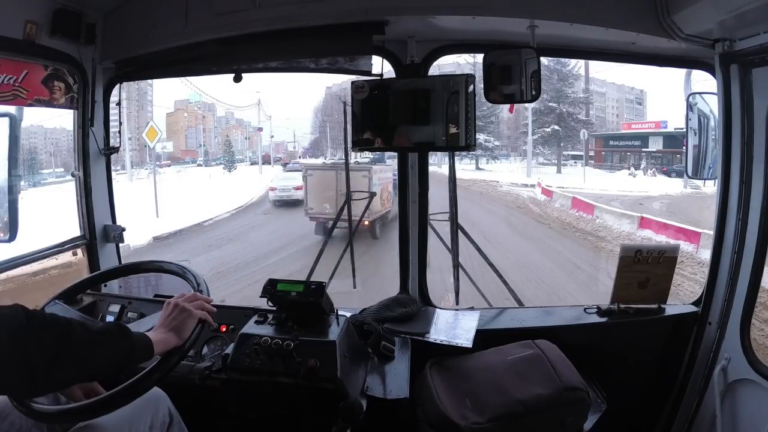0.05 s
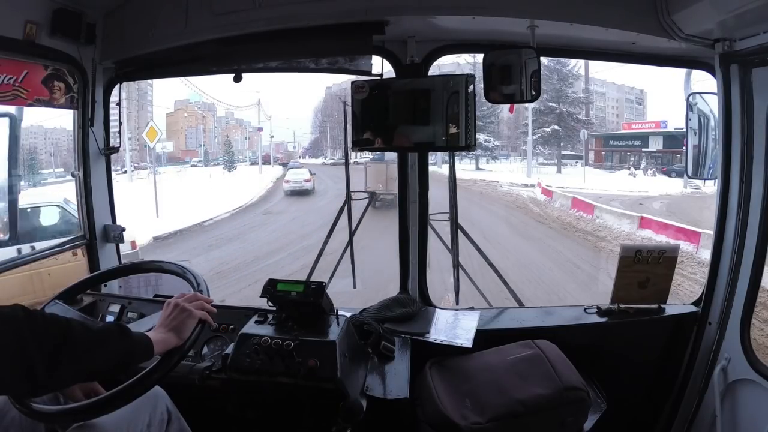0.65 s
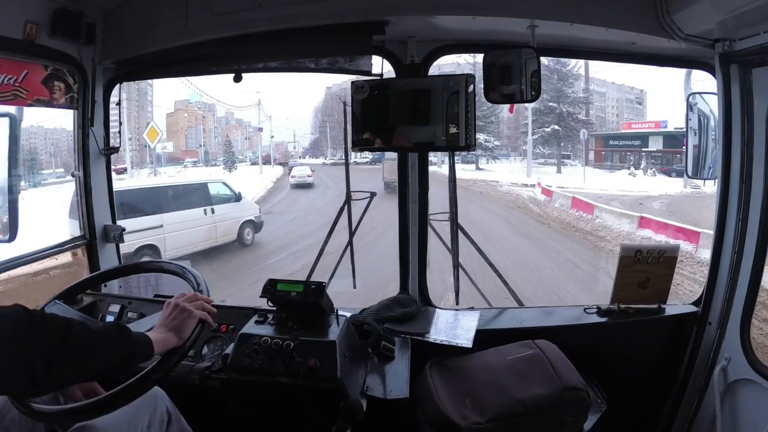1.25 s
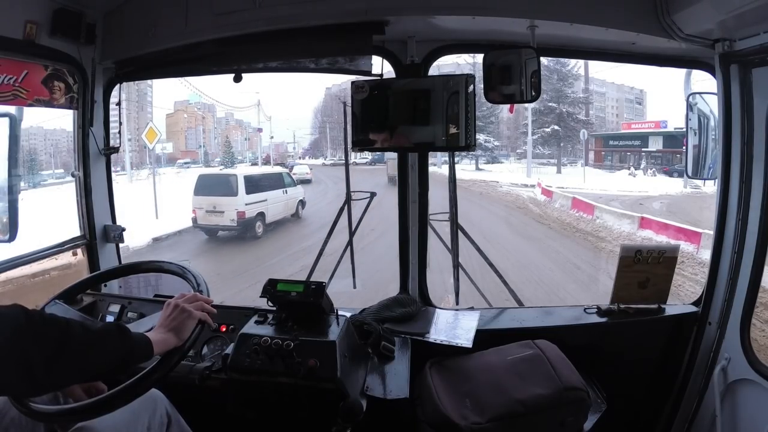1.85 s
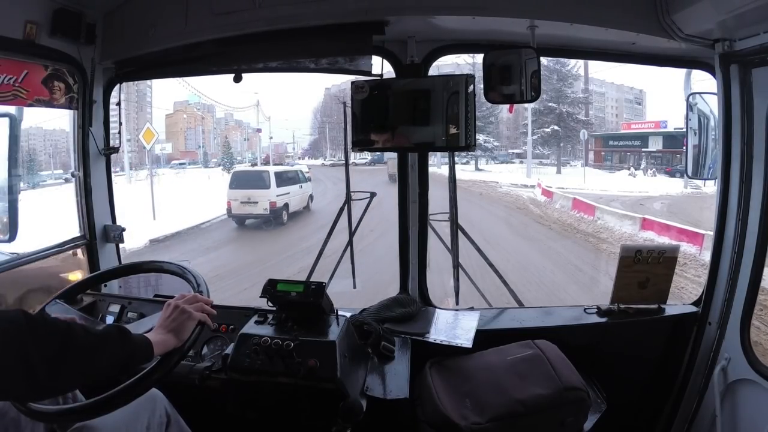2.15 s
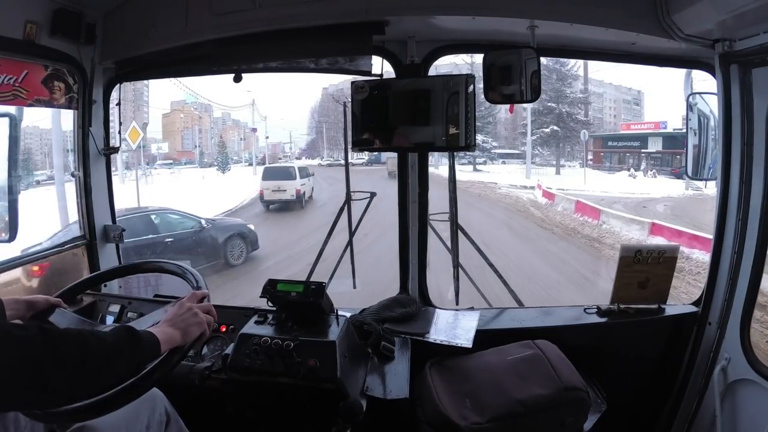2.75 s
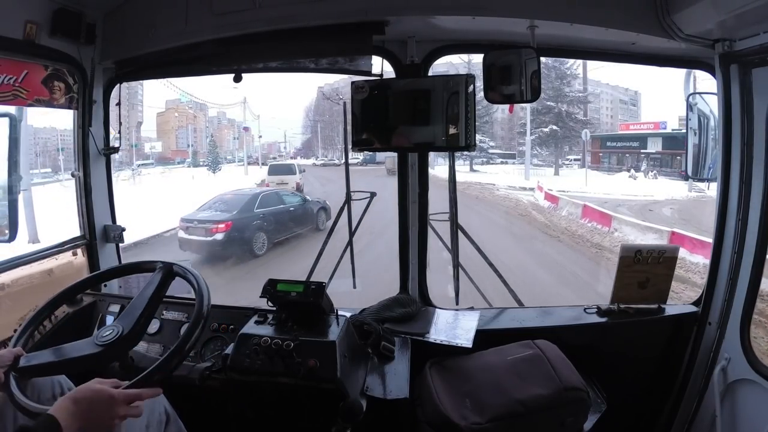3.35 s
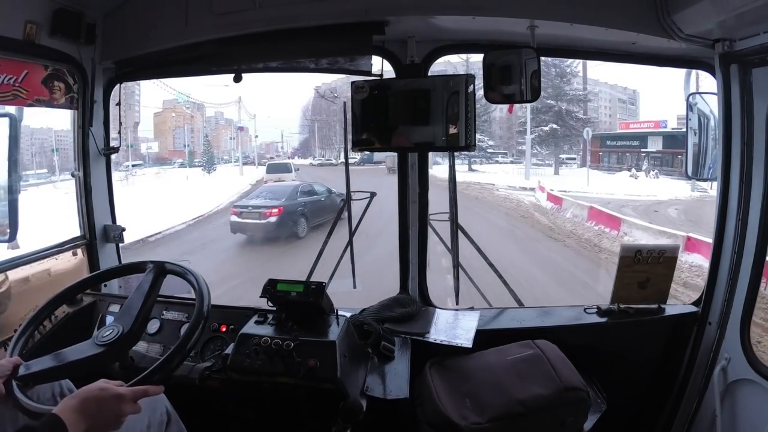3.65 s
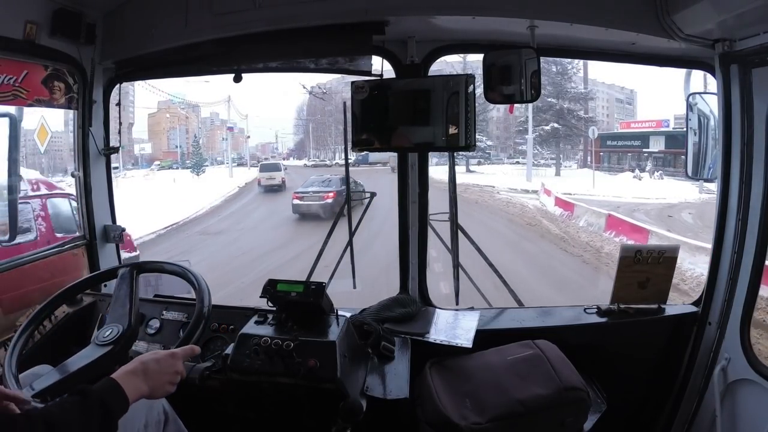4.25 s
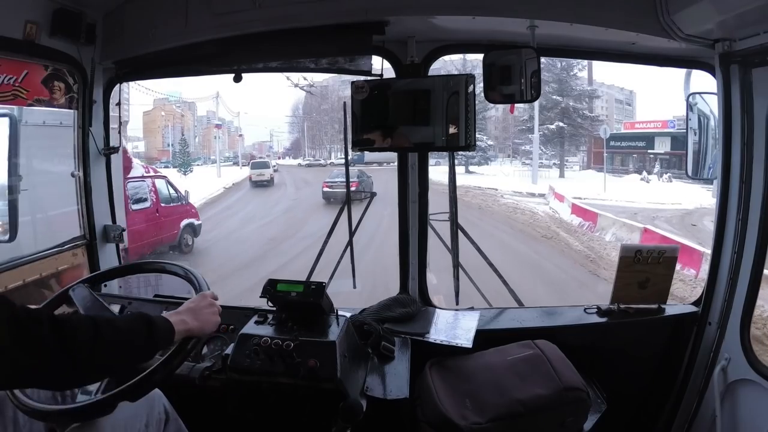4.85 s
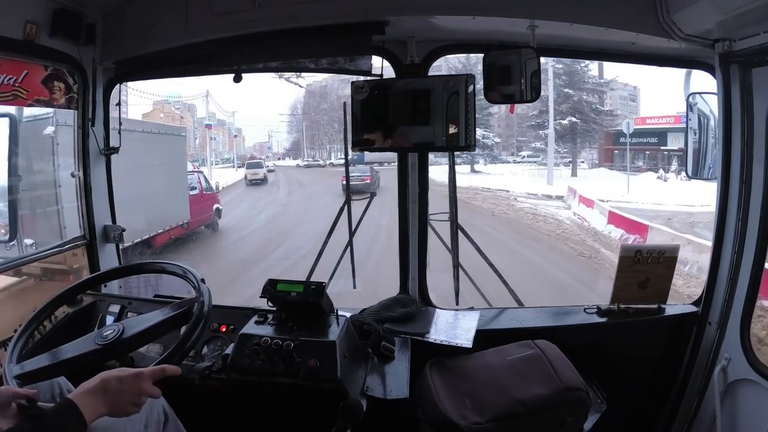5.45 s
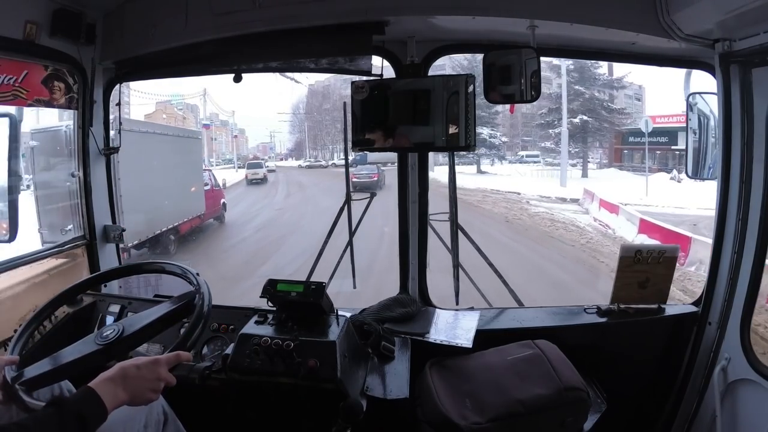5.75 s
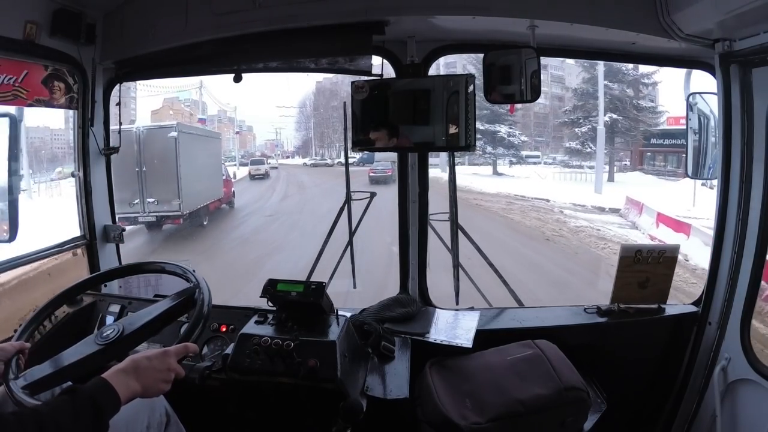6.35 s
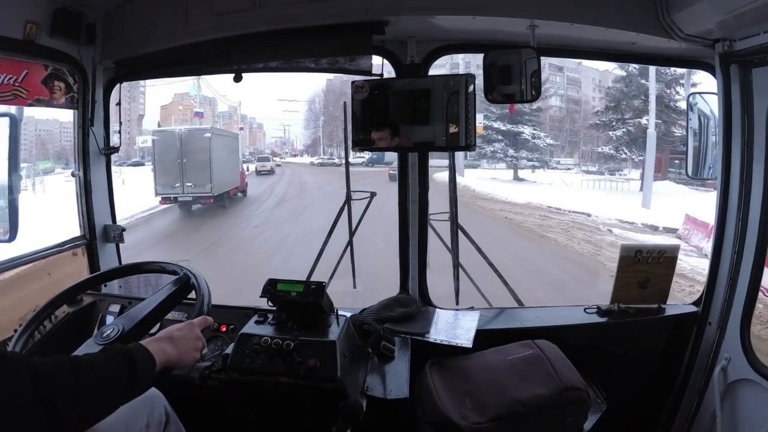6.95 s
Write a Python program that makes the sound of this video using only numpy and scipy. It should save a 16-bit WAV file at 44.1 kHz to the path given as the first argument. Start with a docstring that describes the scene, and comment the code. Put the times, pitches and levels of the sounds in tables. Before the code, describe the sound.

A steady low boom and the hiss of wet tyres on slush fill the cab of a slow trolleybus for seven seconds, heard in stereo. Bumps thud in the panels and rattle loose fittings from 0.4 to 0.9 seconds, at 2.3, in a cluster around 3.8 and again at 6.8. Slightly right, gears whine faintly, clearest between 5 and 6 seconds. An auxiliary motor holds a soft tone until 3 seconds, then sinks in pitch and fades. The electric drive hums briefly at about 2.2 seconds, returns at 3.5, is strong from 4 and stops at 6. Outside, overtaking vehicles throw up swishing spray, lightly around 3 seconds, louder at 5.4 and loudest from 6 to the end. A thin, very high electrical whistle stays at far right throughout.

```python
"""A low boom and the hiss of wet tyres, heard from a stereo microphone in the cab of a slow trolleybus.
The slushy road shakes the body; bumps knock the panels and rattle loose fittings. Outside, overtaking
vehicles throw up spray. A little to the right, gears whine faintly, an auxiliary motor runs and coasts
down, and the drive hums at 300 Hz while it draws current. A thin electrical whistle sits hard right."""
import sys
import numpy as np
from scipy import signal
from scipy.fft import rfft, irfft, next_fast_len
from scipy.io import wavfile
from scipy.ndimage import uniform_filter1d

SR = 44100
rng = np.random.default_rng(int(sys.argv[2]) if len(sys.argv) > 2 else 0)


def materialize(psi):
    """Save the field psi as 16-bit PCM at rate SR to the path in sys.argv[1].

    A 1-D psi becomes a single channel; in a 2-D psi each row is a channel.
    """
    bounded = np.clip(np.atleast_2d(psi).T, -1, 1)
    quanta = np.round(bounded * 32767).astype(np.int16)
    wavfile.write(sys.argv[1], SR, quanta)


N = 309141
T = np.arange(N) / SR
FFT_SIZE = next_fast_len(N, True)
FREQ = np.fft.rfftfreq(FFT_SIZE, 1 / SR) + 1e-3

# noise spectra as heard in the cab: f/Hz, relative level/dB
CHASSIS_SPECTRUM = [(22, 1.5), (45, 5.5), (57, -4), (74, 7), (90, -4), (115, 5)]
BOOM_SPECTRUM = [(120, -22.5), (131, -14.5), (147, -5.5), (165, -9.5), (184, 0.5), (200, 1.5), (218, -0.5),
                 (245, -8), (275, -8.5)]
DRONE_SPECTRUM = [(255, -8), (285, -11), (328, 4), (372, -3.5), (420, -3), (455, -3), (505, -0.5),
                  (560, -11.5), (640, -14), (710, -20.5)]
TYRE_SPECTRUM = [(620, -10.5), (700, -2.5), (790, 3.5), (840, 3), (910, 3), (1000, -4), (1150, -3),
                 (1300, -10.5), (1500, -15.5), (1680, -11), (2000, -13.5), (2400, -33)]
SLUSH_SPECTRUM = [(1900, -10), (2700, -11), (3300, -2.5), (4800, -1), (5400, -1.5), (5800, 1), (6500, -4),
                  (8000, -6.5), (10000, -11.5), (13000, -18), (16000, -11)]
SPRAY_SPECTRUM = [(550, -3), (750, -1), (1050, 2), (1300, -7), (1750, 1.5), (2050, -1.5), (2500, -7),
                  (4000, -10), (5000, -12), (6500, -16.5), (8000, -21), (11000, -25.5), (16000, -32)]
CLATTER_SPECTRUM = [(600, -14), (1000, 9), (2000, 6), (2800, -4.5), (4500, -7.5), (8000, -30), (16000, -38)]  # large fittings
JINGLE_SPECTRUM = [(2600, -12), (3500, -17), (6000, 5), (10000, -1), (15000, -2.5), (16500, -6)]  # small fittings
THIN_HISS_SPECTRUM = [(8500, -5), (10500, -1), (11300, -2), (11800, -6)]
# stereo image at the microphone
MIC_WIDTH = [(30, -20), (200, -29), (330, -22), (500, -14), (850, -15.5), (1220, -1), (1700, -5.5),
             (2050, -4.5), (2550, 4), (3400, -1), (5700, -5), (8000, -5.5), (14000, -1.5)]  # f/Hz, side minus mid/dB
MIC_BALANCE = [(60, 0), (150, -1), (380, -1), (700, 0), (1290, 2), (2380, 0), (4400, -3), (8100, 1.9),
               (15000, -2)]  # f/Hz, left minus right/dB
# the body's boom over time
BOOM_BASE = [(0, -20.5), (.5, -23), (.8, -20.3), (2.3, -23), (3.3, -22.5), (3.9, -21), (4.85, -19.5),
             (5.55, -22), (6.05, -21), (7.01, -21)]  # slow course: t/s, level/dB
BOOM_SWELLS = [(.385, -18), (.68, -15), (.86, -20), (1.53, -22), (1.72, -19.5), (2.2, -19), (2.96, -21.5),
               (3.155, -17), (3.325, -18), (3.505, -17), (3.86, -19.5), (4.985, -20), (6.79, -18)]  # added swells: t/s, level/dB
BOOM_LULLS = [(.48, 0.57), (1.48, .4), (2.27, .6)]  # brief dips: t/s, share of amplitude lost
# spray of overtaking vehicles: loudest at t/s, level/dB, time to half power/s
OVERTAKES = [(.6, -57, 0.42), (3.0, -44, 0.67), (5.4, -40, 0.72), (6.14, -39, .1), (6.75, -36.5, 0.85)]
# auxiliary motor partials: multiple of its note, level before resonance and fade/dB
MOTOR_PARTIALS = [(1, -34.5), (2, -46.5)]
# gear whines: start t/s, end t/s, first f/Hz, last f/Hz, level/dB
GEAR_WHINES = [(.3, 3.3, 886, 892, -45.5), (0.097, 2.8, 645, 636, -47), (0.27, 2.7, 1200, 1140, -48),
               (3.1, 4.9, 1100, 1008, -47), (5.05, 5.35, 572, 550, -33.5), (5.38, 5.9, 560, 564, -35.5),
               (1.5, 7.01, 1500, 1600, -58)]
# bumps: peak t/s, rise/s, decay/s, wall thud/dB, dashboard knock/dB, clatter/dB, jingle/dB
ROAD_BUMPS = [(.40, 0.045, 0.033, -28, -44, -45, -49), (.514, 0.013, 0.033, -32, -38, -36, -47),
              (.594, 0.022, 0.045, -18.5, -25.5, -34.5, -45.5), (.86, .009, 0.042, -34, -35, -39, -47),
              (1.374, 0.0049, 0.025, -42, -46, -42, -53), (2.233, 0.0087, .015, -37, -43, -52, -49),
              (2.304, 0.0074, 0.026, -17.5, -40, -35, -56), (3.765, 0.016, 0.024, -18.5, -28, -47, -62),
              (3.844, 0.027, 0.033, -17, -24.5, -31.5, -40), (3.966, 0.011, 0.034, -32, -32, -43, -48),
              (4.015, 0.0029, 0.015, -42, -44, -55, -45), (6.779, 0.0089, 0.045, -16, -21, -35, -55)]
# modes of the big wall panels and the stiffer dashboard: f/Hz, width/Hz, relative level/dB
WALL_MODES = [(223, 104, -3), (326, 46, 10), (381, 46, 6), (497, 29, 6.5)]
DASHBOARD_MODES = [(588, 83, -4), (770, 24, 2.5), (950, 210, -9), (1105, 130, -6.5), (1220, 130, -11.5)]
# spells of traction current: on t/s, off t/s, hum level/dB
CURRENT_SPELLS = [(2.12, 2.312, -20.5), (3.493, 3.95, -25), (3.973, 5.35, -16.5), (5.349, 5.996, -17.5)]


def undb(db):
    """Decibels to gain."""
    return 10 ** (np.asarray(db) / 20)


def unit(x):
    """Scale to rms 1."""
    return x / np.sqrt(np.mean(x ** 2))


def shape(points):
    """Gain at every frequency from (f/Hz, level/dB) points, flat beyond the ends."""
    hz, db = np.transpose(points)
    return undb(np.interp(np.log(FREQ), np.log(hz), db))


def band(points, skirt_db_per_octave=40):
    """Like shape, but falling away beyond the ends."""
    octaves_out = np.abs(np.log2(FREQ / np.clip(FREQ, points[0][0], points[-1][0])))
    return shape(points) * undb(-skirt_db_per_octave * octaves_out)


def wander(rate_hz):
    """A smooth random curve of rms 1."""
    knots = rng.standard_normal(1024)
    return unit(uniform_filter1d(np.interp(T * rate_hz, np.arange(len(knots)), knots), size=400))


def swell(at_s, half_s):
    """A bell curve of height 1 around a moment."""
    return np.exp(-np.minimum(((T - at_s) / half_s) ** 2, 20))


def grains(per_s):
    """Two streams of tiny collisions of uneven size."""
    return unit((rng.random((2, N)) < per_s / SR) * rng.standard_normal((2, N)))


def steady(pair, window_s):
    """Even out the slow swells of a narrow-band vibration."""
    power = uniform_filter1d(np.mean(pair ** 2, axis=0), int(window_s * SR))
    return pair / np.sqrt(power)


def sing(hz, wobble, waver_db):
    """A tone near rms 1, unsteady in pitch and level."""
    pitch = hz * (1 + wobble * wander(26))
    return np.sqrt(2) * undb(waver_db * wander(14)) * np.sin(2 * np.pi * np.cumsum(pitch) / SR)


def at_mic(spectrum, excitation):
    """Colour two streams into left and right, mid rms 1; long waves reach both microphone ports alike."""
    mid, side = rfft(excitation, FFT_SIZE) * spectrum
    side = side * shape(MIC_WIDTH)
    lean = np.sqrt(shape(MIC_BALANCE))
    pair = irfft(np.array([(mid + side) * lean, (mid - side) / lean]), FFT_SIZE)[:, :N]
    return pair / np.std(pair.mean(axis=0))


def body_boom():
    """The body booms around the microphone; the boom swells and dips briefly at irregular moments."""
    base_power = undb(np.interp(T, *np.transpose(BOOM_BASE))) ** 2
    swell_power = sum(undb(db) ** 2 * swell(at_s, half_s=.024) for at_s, db in BOOM_SWELLS)
    dips = sum(share * swell(at_s, half_s=.034) for at_s, share in BOOM_LULLS)
    boom = steady(at_mic(band(BOOM_SPECTRUM), rng.standard_normal((2, N))), window_s=.086)
    return boom * np.sqrt(base_power + swell_power) * (1 - dips)


def road(flutter_db=.63):
    """Below the cab, the tyres shake the chassis, roar on the asphalt and hiss in the slush."""
    noise = rng.standard_normal((4, 2, N))
    surface = undb(flutter_db * wander(22))  # ridges of packed snow
    chassis = steady(at_mic(band(CHASSIS_SPECTRUM), noise[0]), window_s=.2) * undb(-41.5)
    drone = steady(at_mic(band(DRONE_SPECTRUM), noise[1]), window_s=.29) * undb(-26)
    tyres = at_mic(band(TYRE_SPECTRUM), noise[2]) * undb(-36)
    slush = at_mic(band(SLUSH_SPECTRUM), noise[3]) * undb(-49)
    return chassis + surface * (drone + tyres) + slush


def traffic_spray(far_traffic_db=-48.5, flutter_db=.68):
    """Vehicles overtake outside, throwing up an uneven spray that falls off with distance."""
    near_power = sum(undb(db) ** 2 / (1 + ((T - at_s) / half_s) ** 2) for at_s, db, half_s in OVERTAKES)
    gain = np.sqrt(undb(far_traffic_db) ** 2 + near_power)
    spray = rng.standard_normal((2, N)) + .43 * grains(per_s=3600)
    return at_mic(band(SPRAY_SPECTRUM), spray) * gain * undb(flutter_db * wander(12))


def auxiliary_motor(running_hz=425, off_s=2.97, fall_hz_per_s=92, fade_db_per_s=15, fade_after_s=.35):
    """A motor holds its note; switched off, it sinks through a resonance of its mounting and fades."""
    mount_hz, mount_width_hz, mount_db = 411, 12, 5.5
    coasting_s = np.maximum(T - off_s, 0)
    hz = np.maximum(running_hz - fall_hz_per_s * coasting_s, 0)
    resonance_db = mount_db / (1 + ((hz - mount_hz) / mount_width_hz) ** 2)
    gain = undb(resonance_db - fade_db_per_s * np.maximum(coasting_s - fade_after_s, 0))
    return gain * sum(undb(db) * sing(k * hz, wobble=.005, waver_db=2.4) for k, db in MOTOR_PARTIALS)


def electrical_whistle(line_hz=15704.3, field_hz=59.94, blip_s=.001, level_db=-42.5):
    """Line-scan electronics whistle, with a slightly lower blip once a field."""
    field_phase = 2 * np.pi * field_hz * T
    line_phase = 2 * np.pi * line_hz * T
    flicker = 1 + .2 * np.cos(field_phase) + .08 * wander(70)
    tone = flicker * np.sin(line_phase - .2 * np.sin(field_phase))
    blip_gate = np.exp(-(np.sin(field_phase / 2) / (np.pi * field_hz * blip_s)) ** 2)
    blips = .6 * blip_gate * np.sin(line_phase - 6 * field_phase)
    return np.sqrt(2) * undb(level_db) * (tone + blips)


def gear_whines():
    """Gears sing faint lines that glide a little as they swell and fade."""
    whines = 0
    for start_s, end_s, first_hz, last_hz, db in GEAR_WHINES:
        progress = np.clip((T - start_s) / (end_s - start_s), 0, 1)
        arch = np.sqrt(4 * progress * (1 - progress))
        hz = first_hz + (last_hz - first_hz) * progress
        whines += undb(db) * arch * sing(hz, wobble=.00599, waver_db=2.5)
    return whines


def panel_response(modes, contact_hz=2200):
    """Spectrum of a panel's damped modes under a soft contact."""
    ring = sum((-1) ** k * undb(db) / (1 + 1j * hz / width * (FREQ / hz - hz / FREQ))
               for k, (hz, width, db) in enumerate(modes))
    return ring / (1 + (FREQ / contact_hz) ** 2)


def rattles():
    """Each bump sets off a flurry of collisions in the panels and loose fittings near the microphone."""
    envelopes = np.zeros((4, N))
    for peak_s, rise_s, decay_s, *levels_db in ROAD_BUMPS:
        falloff = np.where(T < peak_s, ((T - peak_s) / rise_s) ** 2, (T - peak_s) / decay_s)
        envelopes += np.outer(undb(levels_db), np.exp(-np.minimum(falloff, 20)))
    thud, knock, clatter, jingle = envelopes
    walls = steady(at_mic(panel_response(WALL_MODES), grains(per_s=1000)), window_s=.021)
    dashboard = steady(at_mic(panel_response(DASHBOARD_MODES), grains(per_s=1400)), window_s=.028)
    large_fittings = at_mic(band(CLATTER_SPECTRUM), grains(per_s=5500))
    small_fittings = at_mic(band(JINGLE_SPECTRUM), grains(per_s=22000))
    return thud * walls + knock * dashboard + clatter * large_fittings + jingle * small_fittings


def traction_hum(ripple_hz=300.2, lag_s=.02, drift_rad=.051, octave_db=-32):
    """Six-pulse ripple of the rectified mains shakes the traction motor while current flows."""
    demand = sum(undb(db) * ((T >= on_s) & (T < off_s)) for on_s, off_s, db in CURRENT_SPELLS)
    pole = np.exp(-1 / (lag_s * SR))
    current = signal.lfilter([1 - pole], [1, -pole], demand + 1e-9)
    port_rad = np.array([[.1], [-.1]])  # reaches the microphone ports slightly out of step
    phase = 2 * np.pi * ripple_hz * T + drift_rad * wander(4.4) + port_rad
    return np.sqrt(2) * current * (np.sin(phase) + undb(octave_db) * np.sin(2 * phase))


def thin_hiss(start_s=2.3, fade_in_s=.1, level_db=-62):
    """A faint hiss comes in high in the treble as the first spell of current ends."""
    fade_in = np.clip((T - start_s) / fade_in_s, 0, 1)
    return at_mic(band(THIN_HISS_SPECTRUM), rng.standard_normal((2, N))) * undb(level_db) * fade_in


def scene():
    """Road, spray and rattles surround the microphone; the drive is a little right, the whistle fully."""
    surroundings = body_boom() + road() + traffic_spray() + rattles() + thin_hiss()
    drive = (auxiliary_motor() + gear_whines() + traction_hum()) * undb([[-.55], [.55]])
    whistle = electrical_whistle() * np.array([[0], [1]])
    return surroundings + drive + whistle


def record(dry):
    """The microphone chain cuts the top steeply above 15.9 kHz."""
    return signal.sosfilt(signal.ellip(10, .1, 80, 15900, fs=SR, output="sos"), dry)


dry = scene()
out = record(dry)
materialize(out)
```